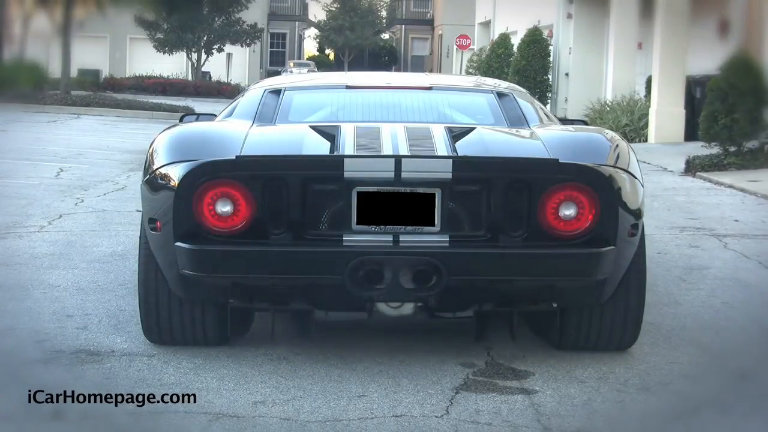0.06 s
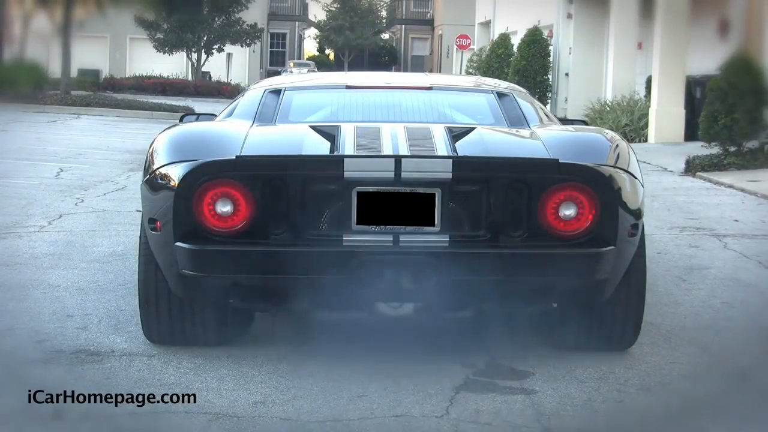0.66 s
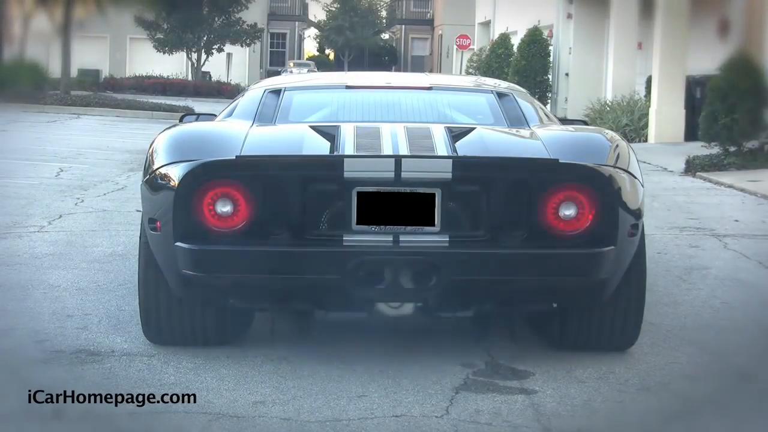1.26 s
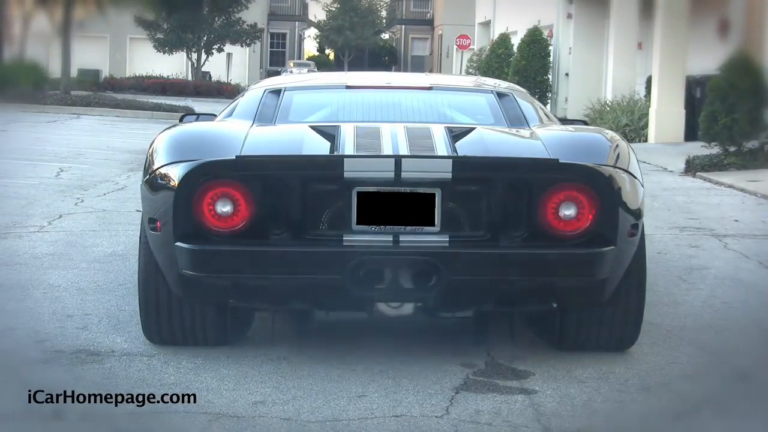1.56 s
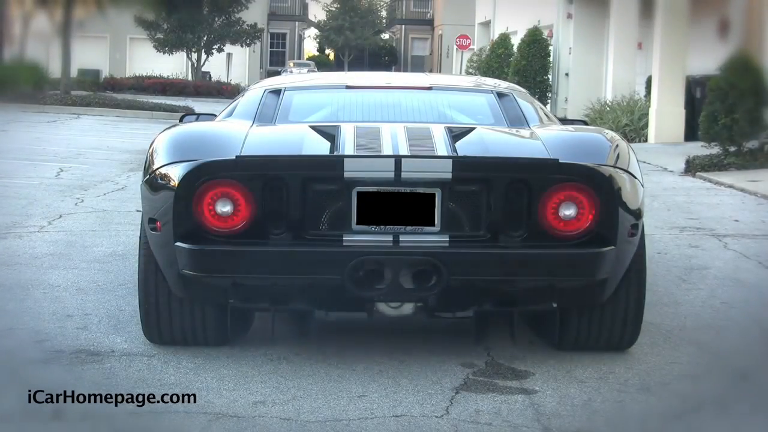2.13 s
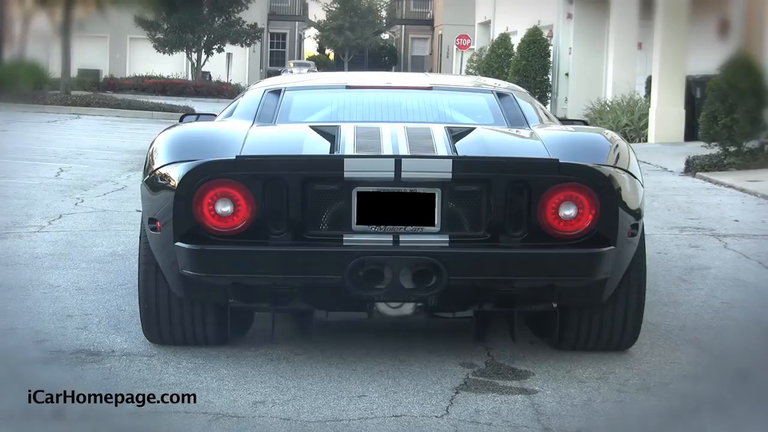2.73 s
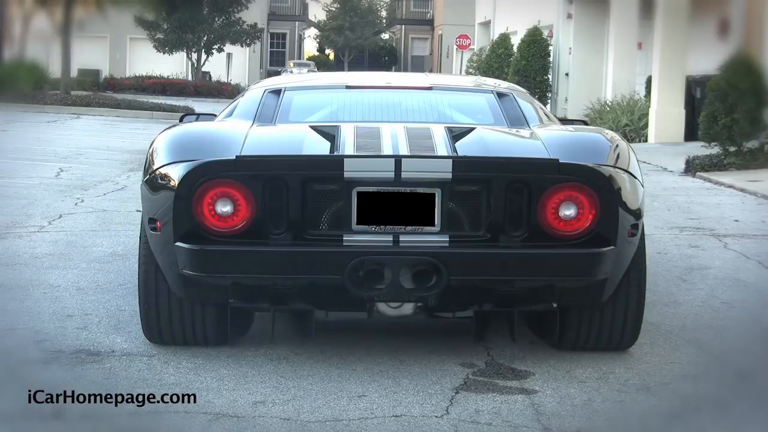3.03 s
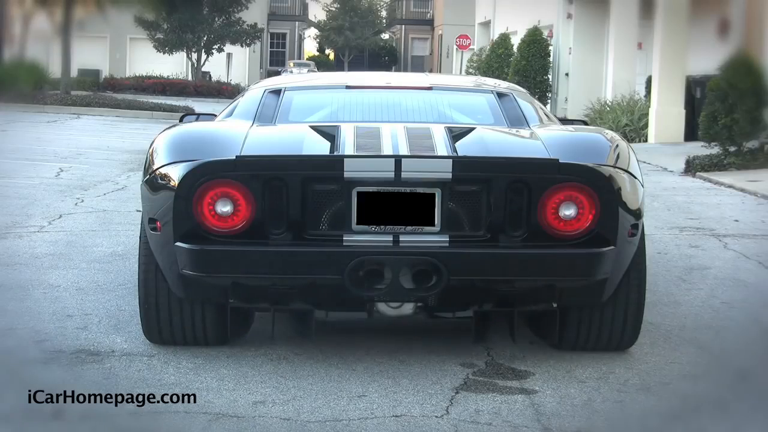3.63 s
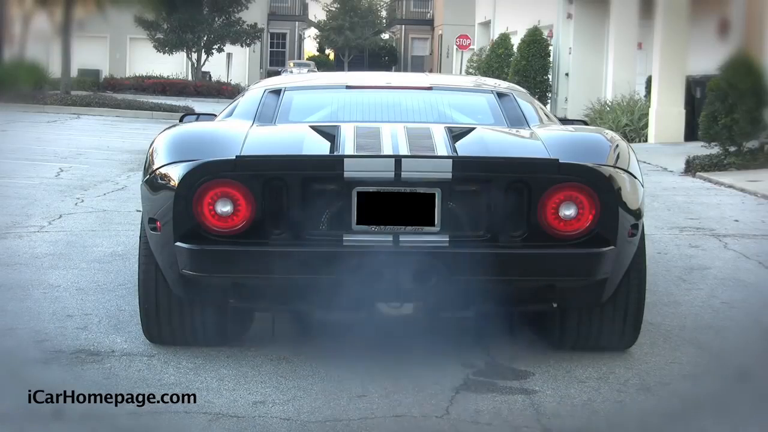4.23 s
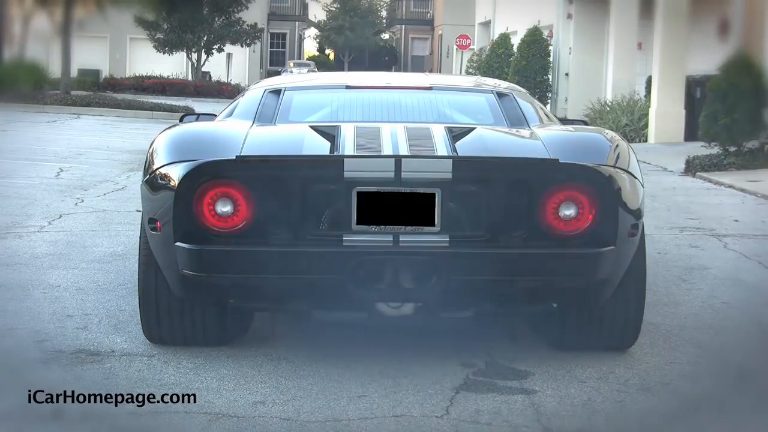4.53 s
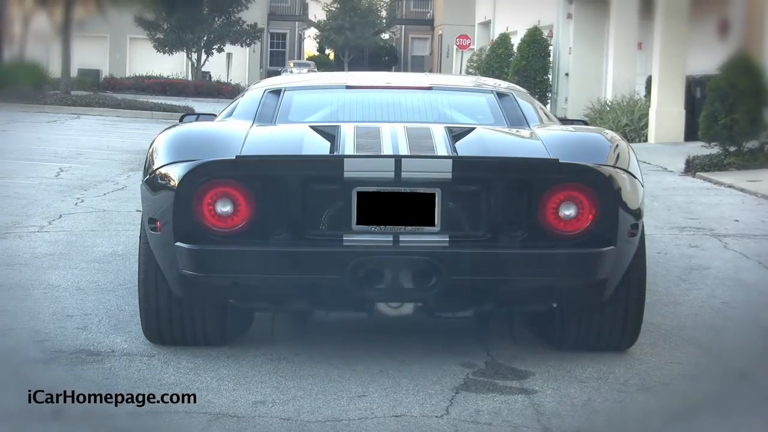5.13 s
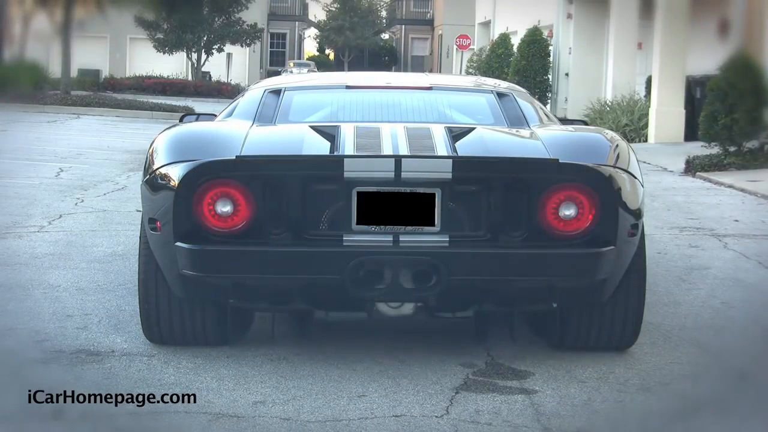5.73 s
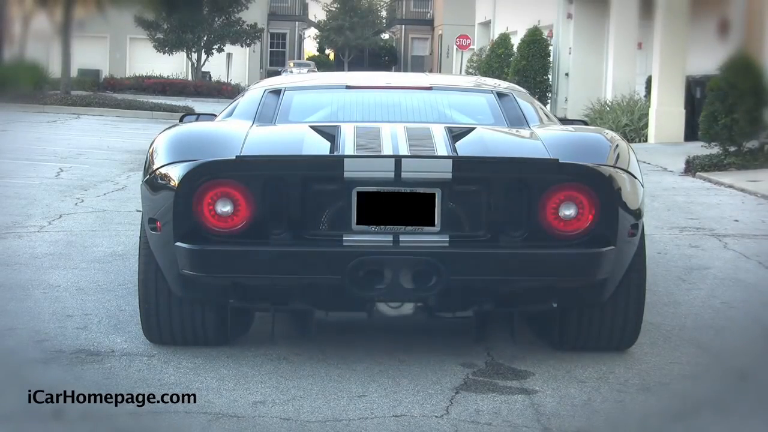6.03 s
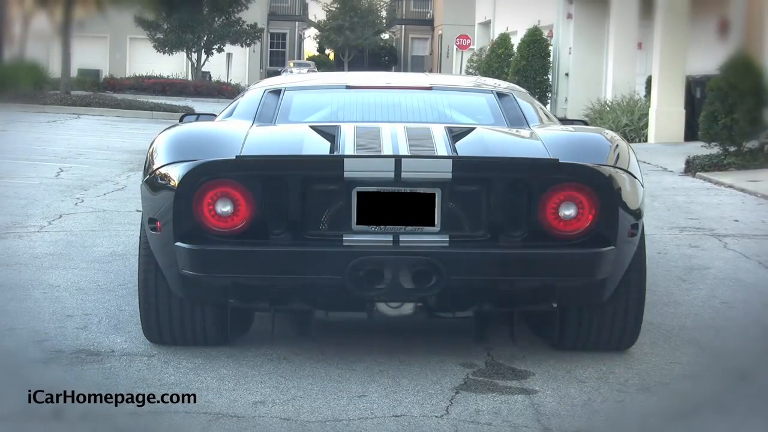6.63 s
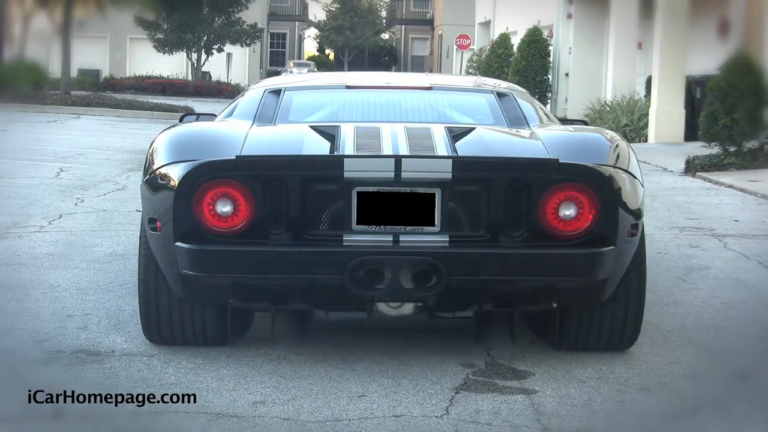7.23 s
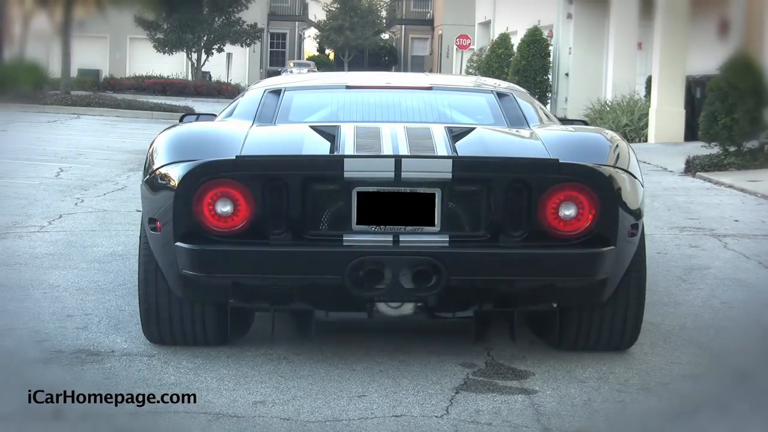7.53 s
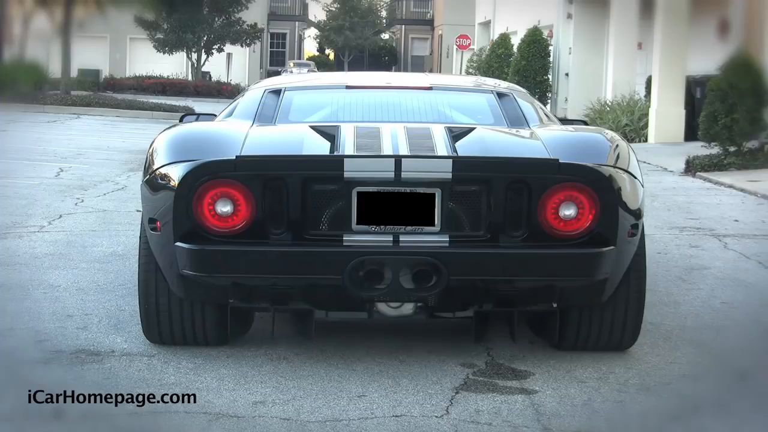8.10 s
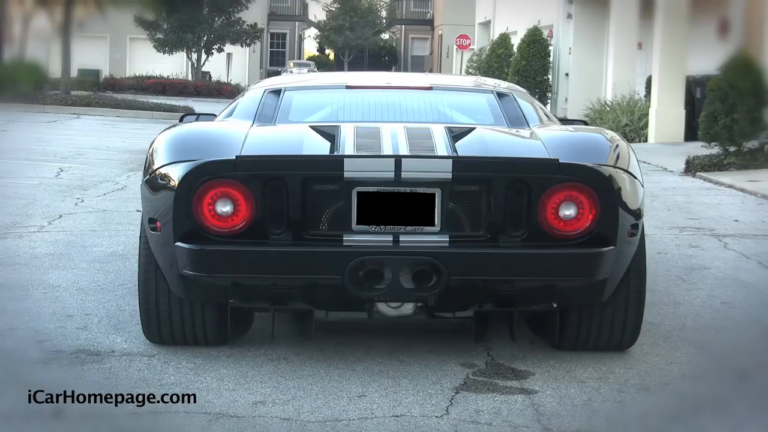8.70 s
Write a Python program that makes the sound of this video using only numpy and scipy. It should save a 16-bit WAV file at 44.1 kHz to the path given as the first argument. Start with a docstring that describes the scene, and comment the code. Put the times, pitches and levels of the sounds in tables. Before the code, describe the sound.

A sports car engine revs twice in loud, rasping barks, popping and burbling down to a loping idle.

```python
"""A street between house fronts, microphone just behind the tailpipes of a parked V8 sports car.
The engine is blipped twice; each blip barks and overloads the microphone. It burbles and hisses on
the way down, is caught by its idle governor and at last settles to a loping idle. Exhaust strokes
ring the pipes, gas turbulence gives rasp and hiss, and fuel pops in the silencer. Behind it are
ticking valves, dull echoes off the houses and a faint low rumble."""
import sys
import numpy as np
from scipy import signal
from scipy.fft import rfft, irfft, next_fast_len
from scipy.io import wavfile
from scipy.ndimage import uniform_filter1d

SR = 44100
rng = np.random.default_rng(int(sys.argv[2]) if len(sys.argv) > 2 else 0)


def waveform_to_disk(signal):
    """Save audio, clipped to [-1, 1], as 16-bit WAV at the path in sys.argv[1]."""
    frames = np.transpose(np.atleast_2d(signal))
    scaled = np.clip(frames, -1, 1) * 32767
    samples = np.round(scaled).astype(np.int16)
    wavfile.write(sys.argv[1], SR, samples)


N = 386316

# cylinders in firing order, both columns scaled by the spread: level/dB, lateness/ms
CYLINDERS = [(-3.5, -2.06), (3, 2.31), (.9, .98), (-1.1, 1.07), (2.2, 2.09), (-1.4, 1.61), (.8, 1.45),
             (3.6, 1.78)]
# pipe and silencer resonances: f/Hz, width/Hz, level/dB
PIPE_MODES = [(100.8, 25.3, 1), (162.4, 12.2, 5.5), (256.45, 11.8, 16.5), (332.6, 45, -3),
              (402.5, 15.3, 0.5), (462, 3.4, -13.5), (563, 15, -13.5), (628, 22, -26)]
# afterfire in the silencer: t/s, level/dB, crack relative to that level/dB
POPS = [(.071, -7, -9), (0.113, -5, -3.5), (0.161, -6, -1), (0.206, 0, -28), (0.229, 2, -16),
        (1.384, -7, -17), (1.463, -8, -26), (2.108, -7.5, -30), (2.957, -13.5, 8.5), (3.901, -4, -0.5),
        (4.959, -2.5, -8), (5.049, -13.5, 10.5), (5.054, -14, 4), (5.725, -6, -14), (5.733, -8, -24)]
# spectra of exhaust rasp, gas hiss, metallic clatter and valve ticks: f/Hz, level/dB
RASP_SPECTRUM = [(180, -12.5), (300, 2), (341, 1), (473, 1), (515, -2.5), (656, 1), (836, -12.5),
                 (977, -15.5), (1560, -13.5), (1800, -9.5), (2170, -15), (2400, -12.5), (9000, -26.5),
                 (11700, -25), (19800, -120)]
HISS_SPECTRUM = [(1760, -29), (3000, 1), (3450, -5), (4380, -1), (5630, -7), (7050, -5), (8050, -7),
                 (9520, -4), (12100, -16), (13100, -24), (16000, -34)]
CLATTER_SPECTRUM = [(470, 9.5), (800, 5.5), (856, -29), (963, 7), (1040, -4.5), (1180, -4), (1270, -9.5),
                    (1470, 0.5), (1800, 1), (2130, -8), (2500, -1), (3470, -16), (4360, -13.5), (5610, -19),
                    (7800, -22.5), (13200, -33)]
TICK_SPECTRUM = [(1760, -3), (3000, -6.5), (3400, -8.5), (3910, -1), (4600, -2.5), (5330, -10),
                 (6300, -2.5), (7400, -8), (8570, -4), (9790, -8), (11000, -10.5), (11800, -15.5),
                 (16000, -27)]
# overtones that howl on overrun: multiple of the engine cycle rate, level/dB
HOWL_ORDERS = [(19, -6), (25, -4), (29, 1), (33, -4), (37, -4)]
# throttle blips: opens t/s, tops out t/s, shuts t/s, top speed/(firings/s)
BLIPS = [(.206, .555, .56, 321), (3.901, 4.285, 4.34, 312.7)]
# after each blip the governor catches the engine, overshoots and eases off: t/s, speed/(firings/s)
FIRST_RECOVERY = [(2.35, 80.4), (2.55, 89.6), (2.75, 97), (2.92, 125.6), (3.05, 148.1), (3.2, 156),
                  (3.35, 150.5), (3.55, 134.3), (3.9, 107.1)]
LAST_RECOVERY = [(5.88, 86.7), (6.08, 87.4), (6.42, 106.5), (6.62, 111.95), (6.8, 114), (7.1, 108.3),
                 (7.5, 99.3), (7.95, 88.25), (8.35, 89.35), (8.76, 88.1)]
# the governor feeds gas, the cylinders fire more alike and drone: start t/s, end t/s, share/0-1
GOVERNOR_FEEDS = [(2.2, 3.02, .65), (5.92, 6.33, .5)]
# the engine's voice: speed/(firings/s), note/dB, rasp/dB, hiss/dB, roughness/0-1, cylinder spread/factor
PULLING_VOICE = [(111.5, -0.5, -21.5, -26, 0.15, 0.091), (149, -4.5, -15.5, -39, .12, .3),
                 (205.6, 5, -8, -19.5, 0.13, .45), (309.6, 5.5, -4, -13.5, 0.46, 0.66)]  # under throttle: even burning, loudest at the top
COASTING_VOICE = [(100.3, -23.5, -31.5, -36.5, 0.98, 1.4), (160.6, -16.5, -22.5, -32.5, .45, 1.8),
                  (186.3, -15, -31, -51, 0.94, 1), (220.1, -14, -25, -39, 0.26, 5.8),
                  (233.4, -9.5, -14.5, -49, 0.92, 1.1), (264.7, 1, -6, -15.5, 0.098, 3.6),
                  (303, -2, -8.5, -24, .1, 0.99)]  # snarls at the top, burbles in the middle, hisses near the bottom
IDLING_VOICE = [(84.5, -13, -39.5, -50.5, 0.071, 0.97), (117.3, -13, -35, -50, 0.11, 0.98),
                (156, -10.5, -31.5, -57, 0.19, 1)]  # a clean lope
# swells of extra gas: start t/s, end t/s, added note/dB, rasp/dB, hiss/dB, spread evened out/0-1
GAS_SURGES = [(1.337, 1.577, 3.5, 2, 9.5, 0.027), (1.906, 2.198, -0.5, 2.5, 4.5, 0.36),
              (2.177, 2.415, 2.5, 6.5, 9, 0.24), (2.403, 3.3, 0.5, 10, 12.5, 0.12),
              (2.843, 3.09, 7, 2, -13, .8), (3.879, 4.034, 5, 1, 4.5, 0.1), (5.123, 5.277, 4.5, 0, 0, 0.11),
              (5.77, 5.92, 4.5, 10, 6, 0.0093), (5.94, 6.042, 3, 4.5, 5, 0.16),
              (6.269, 6.559, -1, 5.5, 8, 0.17)]
# the engine stumbles before it picks up: start t/s, end t/s, note/dB, rasp/dB, hiss/dB
STUMBLES = [(-.05, .23, -15.5, -31, -43), (2.166, 2.22, -22, -37, -44), (3.71, 3.93, -24, -35.5, -41.5)]
# reflections from the house fronts: delay t/s, level/dB
HOUSE_ECHOES = [(.031, -19), (.058, -23), (.093, -27)]

# engine speeds and their ranges are in firings per second
START_SPEED = 137
BOOM_FROM, BOOM_RANGE = 112, 42  # under throttle the wave at the firing rate builds here
HOWL_FROM, HOWL_RANGE = 225, 35  # on overrun the howl comes in here
CATCH_FROM, CATCH_TO = 93.1, 86  # the governor takes over as the speed falls through here
SHELL_HZ, SHELL_T60_S = 987, 0.21  # ring of the silencer shell


def exhaust_note(clicks, turns, speed, throttle, rough, rushing, fed, boom=2.15, blare_db=-13):
    """Pulses ring the pipes, round at idle and broad in a fast flow; open throttle adds a deep boom."""
    phase = 2 * np.pi * turns
    # where the two banks join, the firing rate partly cancels and its octave is reinforced
    flow = 2 * uniform_filter1d(clicks, SR // 10)
    pulses = clicks + flow * (.21 * np.cos(2 * phase) - .13 * np.cos(phase))
    ringing = (1 - fed) * evened(pipe(pulses)) + fed * evened(pipe(pulses, damping=3))
    ringing = evened(butter(ringing, 583, "low", order=4))
    # in a fast flow the banks cancel half of the firing rate and bring out the uneven burble
    beat = sum(2 * w * uniform_filter1d(clicks * w, SR // 10) for w in (np.cos(phase), np.sin(phase)))
    burble = pipe(clicks - .5 * beat, damping=11.9)
    bark = evened(butter(butter(burble, 480, "low"), 93, "high"))
    broad = np.clip(1.43 * rushing + .75 * ease(rough, .15, .3), 0, 1)
    body = (1 - broad) * ringing + broad * bark
    turbulence = rng.standard_normal(N) * decaying(clicks, decay_s=.13)
    eddies = evened(butter(pipe(turbulence, damping=39), 480, "low"))
    churn = .02 + .7 * rough ** 1.5
    # at higher speeds the pulse fronts steepen and blare
    blare = evened(butter(butter(clicks, 646, "high", order=4), 850, "low", order=3))
    steep = .5 * np.clip((speed - 110) / 60, 0, 1) + 1.3 * rushing
    wave = np.cos(phase) + .28 * np.sin(2 * phase)
    return evened(body + from_db(blare_db) * steep * blare + churn * eddies + boom * throttle ** 2 * wave)


def pipe(x, damping=1):
    """The exhaust system resonates; modes below the strongest one swing against it."""
    ringing = 0
    main_hz = max(PIPE_MODES, key=lambda mode: mode[2])[0]
    for hz, width_hz, db in PIPE_MODES:
        r = np.exp(-np.pi * width_hz * damping / SR)
        gain = from_db(db) * (1 if hz >= main_hz else -1)
        forward = [(1 - r * r) / 2, 0, (r * r - 1) / 2]
        feedback = [1, -2 * r * np.cos(2 * np.pi * hz / SR), r * r]
        ringing = ringing + gain * signal.lfilter(forward, feedback, x + 1e-18)
    return butter(ringing, 53, "high")


def firings(turns, speed, rough, spread):
    """One click per exhaust stroke; spread sets the cylinders apart, rough burning scatters them."""
    at = np.searchsorted(turns, np.arange(int(turns[-1])))
    strength_db, late_ms = np.array(CYLINDERS)[np.arange(len(at)) % len(CYLINDERS)].T
    chance = np.clip(rng.standard_normal((len(at), 2)), -1.6, 1.6)
    jitter_s = .07 * rough[at] * chance[:, 0] / speed[at]
    late_s = np.minimum(spread[at], 1) * late_ms / 1000 + jitter_s
    scatter_db = (.4 + 3 * rough[at]) * chance[:, 1]
    onsets = np.clip((at + SR * late_s).astype(int), 0, N - 1)
    clicks = np.zeros(N)
    clicks[onsets] = from_db(np.minimum(spread[at], 2) * strength_db + scatter_db)
    return clicks


def crank(speed, last_stroke=.11):
    """Counts one turn per firing, ending on a given place in the firing order."""
    turns = np.cumsum(speed) / SR
    return turns + (last_stroke - turns[-1]) % len(CYLINDERS)


def engine_speed(t):
    """Firings per second: each blip sweeps up in an S, then coasts down until the governor holds it."""
    speed = np.full(N, float(START_SPEED))
    for (open_s, top_s, _, top), recovery in zip(BLIPS, (FIRST_RECOVERY, LAST_RECOVERY)):
        before = speed[int(open_s * SR)]
        rising = before + (top - before) * ease(t, open_s, top_s - open_s)
        falling = np.maximum(coasting_speed(t, top_s, top), look_up(recovery, t)[0])
        speed = np.select([t < open_s, t < top_s], [speed, rising], falling)
    return speed


def coasting_speed(t, top_s, top, hang_s=.05, sag=34.4, sag_s=.22, friction_per_s=128):
    """The speed hangs at the top, sags a little, then friction takes it down steadily."""
    since = np.maximum(t - top_s - hang_s, 0)
    return top - sag * (1 - np.exp(-since / sag_s)) - friction_per_s * since


def engine_state(t, speed, bite_s=.0051, shutting_s=.074, stumble_rough=.6, stumble_spread=1.3):
    """Blends idling, stumbling, pulling, coasting: note, rasp, hiss in dB, roughness, spread, throttle."""
    state, throttle = look_up(IDLING_VOICE, speed), 0
    for start_s, end_s, *levels_db in STUMBLES:
        stumble = ease(t, start_s, .034) * (1 - ease(t, end_s - .02, .044))
        faltering = np.array([*levels_db, stumble_rough, stumble_spread])[:, None]
        state += stumble * (faltering - state)
    for open_s, top_s, shut_s, top in BLIPS:
        # the gas arrives at once, the throttle takes longer to shut
        bite = ease(t, open_s, bite_s)
        held = 1 - ease(t, shut_s - shutting_s / 2, shutting_s)
        uncaught = ease(coasting_speed(t, top_s, top), CATCH_TO, CATCH_FROM - CATCH_TO)
        revving = held * look_up(PULLING_VOICE, speed) + (1 - held) * look_up(COASTING_VOICE, speed)
        state += bite * uncaught * (revving - state)
        throttle = throttle + bite * held * ease(speed, BOOM_FROM, BOOM_RANGE)
    for start_s, end_s, *added_db, evening in GAS_SURGES:
        swell = np.sin(np.pi * np.clip((t - start_s) / (end_s - start_s), 0, 1))
        state[:3] += np.outer(added_db, swell ** 2)
        state[4] *= 1 - evening * swell  # cylinder spread
    return *state, throttle


def gas_lumps(clicks, speed, rough):
    """Slow, erratic strokes push out uneven lumps of gas."""
    stumbling = rough * np.clip((190 - speed) / 90, 0, 1)
    shoves = np.sqrt(clicks) * rng.choice([-1, 1], N)
    lumps = butter(butter(shoves, 152, "low", order=4), 156, "high")
    return from_db(5.5) * stumbling * evened(lumps)


def exhaust_rasp(clicks, rough):
    """Part steep pulse fronts, which erratic burning breaks up, and part turbulence."""
    fronts = evened(coloured(clicks, RASP_SPECTRUM))
    turbulence = stroke_noise(clicks, RASP_SPECTRUM, decay_s=.003, steady=.7)
    return from_db(8.5) * butter(1.4 * (1 - rough) * fronts + .5 * turbulence, 296, "high")


def stroke_noise(clicks, spectrum, decay_s, steady):
    """A puff of coloured noise at each stroke, over a steady share."""
    puffs = evened(decaying(clicks, decay_s))
    return coloured(rng.standard_normal(N) * evened(steady + puffs), spectrum)


def howl(turns, speed, overrun, flutter_hz=65, swell_width_hz=130):
    """On overrun, overtones of the engine cycle flutter and swell as they cross the shell's ring."""
    tones = 0
    for order, db in HOWL_ORDERS:
        per_firing = order / len(CYLINDERS)
        flutter = .4 + .75 * evened(butter(rng.standard_normal(N), flutter_hz, "low"))
        detuning = 2 * (per_firing * speed - SHELL_HZ) / swell_width_hz
        swell = .35 + .65 / (1 + detuning ** 2)
        tone = np.sin(2 * np.pi * (per_firing * turns + rng.random()))
        tones = tones + from_db(db) * flutter * swell * tone
    return tones * overrun


def crackle(clicks, throttle):
    """Under throttle each stroke spits a short burst of gas, now weak, now strong."""
    spits = stroke_noise(scattered(clicks, spread_db=7), RASP_SPECTRUM, decay_s=.002, steady=.1)
    return from_db(-17) * throttle * butter(spits, 700, "high", order=1)


def afterfire(crack_s=.0025, clank_db=-22, muffled_hz=1100):
    """Fuel pops in the silencer: a thump of the pipes, a clank of the shell and a short crack."""
    pops, cracks = np.zeros((2, N))
    for s, db, crack_db in POPS:
        pops[int(s * SR)] = from_db(db)
        cracks[int(s * SR)] = from_db(db + crack_db)
    thump = butter(pipe(pops, damping=3), muffled_hz, "low")
    thump *= pops.max() / np.abs(thump).max()
    r, w = from_db(-60 / (SHELL_T60_S * SR)), 2 * np.pi * SHELL_HZ / SR
    clank = signal.lfilter([0, np.sin(w)], [1, -2 * r * np.cos(w), r * r], pops + 1e-18)
    crack = butter(rng.standard_normal(N) * decaying(cracks, crack_s), 2200, "low", order=1)
    return thump + from_db(clank_db) * clank + crack


def valve_ticks(clicks):
    """A short tick with every stroke, each of its own strength, over a soft mechanical hiss."""
    taps = scattered(clicks, spread_db=3.5)
    return from_db(7.5) * stroke_noise(taps, TICK_SPECTRUM, decay_s=.0018, steady=.65)


def street(car):
    """The car up close, its dull echoes off the house fronts and a faint low rumble behind."""
    dull = butter(car, 2200, "low", order=1)
    echoes = sum(from_db(db) * np.pad(dull, (int(s * SR), 0))[:N] for s, db in HOUSE_ECHOES)
    rumble = butter(butter(rng.standard_normal(N), 65, "low"), 21, "high")
    return car + echoes + from_db(-94) * rumble / np.std(rumble)


def from_db(db):
    """Decibels to gain."""
    return 10 ** (np.asarray(db) / 20)


def look_up(rows, x):
    """A table's other columns, interpolated where its first column equals x."""
    axis, *columns = np.transpose(rows)
    return np.array([np.interp(x, axis, column) for column in columns])


def ease(x, start, length):
    """A smooth step from 0 to 1."""
    return .5 - .5 * np.cos(np.pi * np.clip((x - start) / length, 0, 1))


def butter(x, hz, kind, order=2):
    """A plain high- or low-pass."""
    return signal.sosfilt(signal.butter(order, hz, kind, fs=SR, output="sos"), x)


def evened(x, span_s=.09):
    """Holds the rms at 1 over about one engine cycle at idle."""
    return x / np.sqrt(np.maximum(uniform_filter1d(x * x, int(span_s * SR)), 1e-12))


def decaying(clicks, decay_s):
    """Each click becomes a jump that dies away."""
    return signal.lfilter([1], [1, -np.exp(-1 / (decay_s * SR))], clicks + 1e-18)


def scattered(clicks, spread_db):
    """The same strokes, each with a random strength."""
    return (clicks > 0) * from_db(spread_db * np.clip(rng.standard_normal(N), -2, 2))


def coloured(x, spectrum):
    """Gives x a spectrum with a minimum-phase filter; rms 1."""
    hz, db = np.transpose(spectrum)
    size = next_fast_len(N + 8192, real=True)
    grid_hz = np.maximum(np.arange(size // 2 + 1) * SR / size, 1)
    gain = from_db(np.interp(np.log(grid_hz), np.log(hz), db))
    cepstrum = irfft(np.log(gain), size)
    cepstrum[1:size // 2] *= 2
    cepstrum[size // 2:] = 0
    shaped = irfft(rfft(x, size) * np.exp(rfft(cepstrum)), size)[:N]
    return shaped / np.std(shaped)


def scene(feed_fade_s=.11, overrun_rough=.24):
    """At the tailpipes: the firings drive note, rasp and hiss; pops and the street are added."""
    t = np.arange(N) / SR
    speed = engine_speed(t)
    note_db, rasp_db, hiss_db, rough, spread, throttle = engine_state(t, speed)
    overrun = (1 - throttle) * ease(speed, HOWL_FROM, HOWL_RANGE)
    rough = np.clip(rough, overrun_rough * overrun, 1)
    fed = sum(share * ease(t, start_s, feed_fade_s) * (1 - ease(t, end_s, feed_fade_s))
              for start_s, end_s, share in GOVERNOR_FEEDS)
    turns = crank(speed)
    clicks = firings(turns, speed, rough, spread * (1 - fed))
    # with little gas flowing, metallic clatter and ticking are heard in place of rasp and hiss
    rushing = np.clip((rasp_db + 25) / 9, 0, 1)
    hissing = np.clip((hiss_db + 50.5) / 8, 0, 1) * (1 - fed) ** 2
    note = exhaust_note(clicks, turns, speed, throttle, rough, rushing, fed)
    lumps = gas_lumps(clicks, speed, rough)
    rasp = exhaust_rasp(clicks, rough)
    clatter = from_db(5) * stroke_noise(clicks, CLATTER_SPECTRUM, decay_s=.017, steady=.38)
    hiss = from_db(3) * stroke_noise(clicks, HISS_SPECTRUM, decay_s=.0092, steady=.049)
    ticks = valve_ticks(clicks)
    howling = howl(turns, speed, overrun)
    low = from_db(note_db) * (note + lumps)
    middle = from_db(rasp_db) * (np.sqrt(rushing) * rasp + np.sqrt(1 - rushing) * clatter + howling)
    top = from_db(hiss_db) * (np.sqrt(hissing) * hiss + np.sqrt(1 - hissing) * ticks)
    return street(low + middle + top + crackle(clicks, throttle) + afterfire())[None]


def record(dry, ceiling=.8, target=.48, release_db_per_s=45, attack_s=.041, cutoff_hz=15900):
    """The close microphone overloads, then a gain control pulls loud passages down to half height."""
    x = butter(dry[0], 105, "high", order=1)
    x = x / (1 + (x / ceiling) ** 6) ** (1 / 6)  # soft clipping
    x = butter(butter(x, 11400, "low"), 38, "high", order=1)
    over_db = 20 * np.log10(np.maximum(np.abs(x) / target, 1))
    release_db = release_db_per_s * np.arange(N) / SR
    held_db = np.maximum.accumulate(over_db + release_db) - release_db
    x = x * from_db(-decaying(held_db, attack_s) / (attack_s * SR))
    return signal.sosfilt(signal.ellip(10, .2, 80, cutoff_hz, fs=SR, output="sos"), x)[None]


dry = scene()
out = record(dry)
waveform_to_disk(out)
```